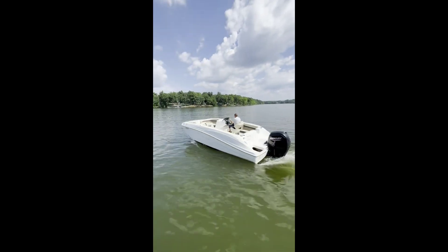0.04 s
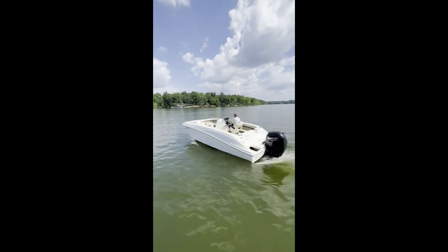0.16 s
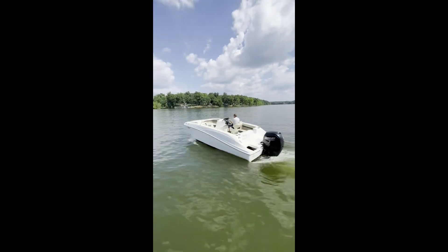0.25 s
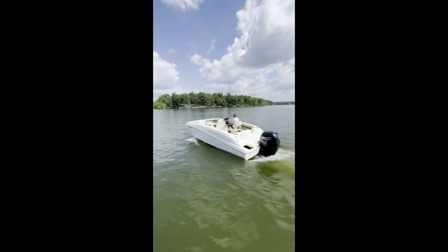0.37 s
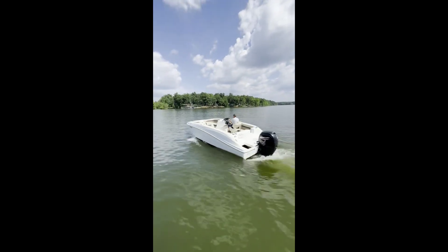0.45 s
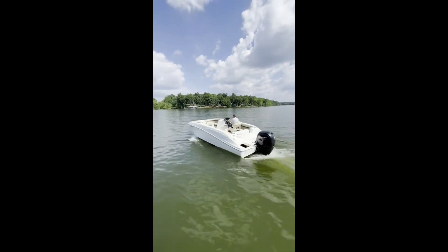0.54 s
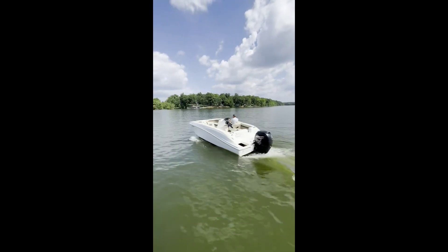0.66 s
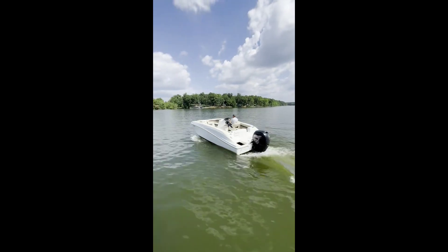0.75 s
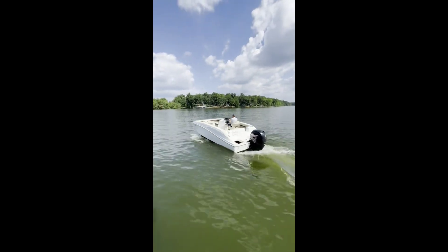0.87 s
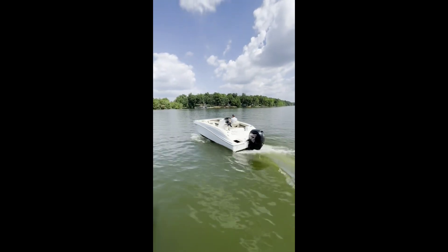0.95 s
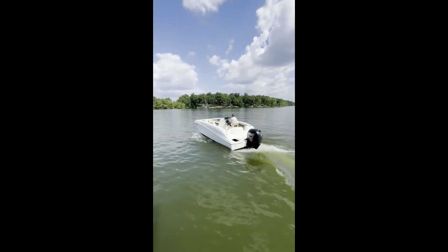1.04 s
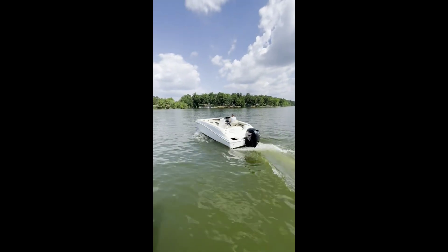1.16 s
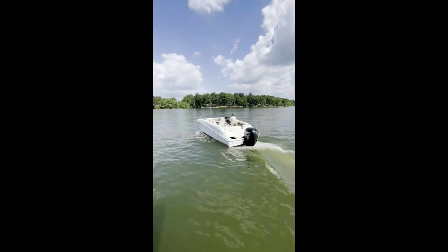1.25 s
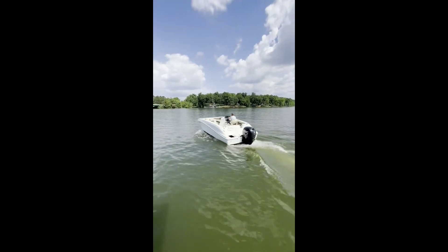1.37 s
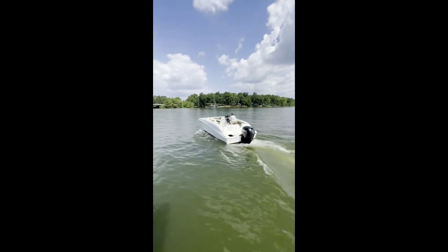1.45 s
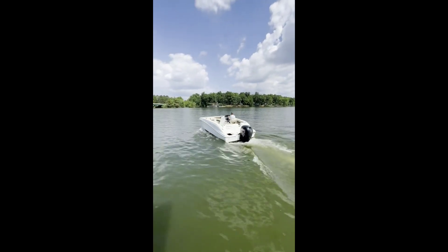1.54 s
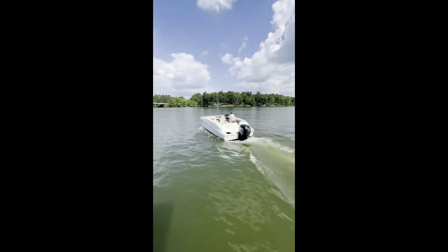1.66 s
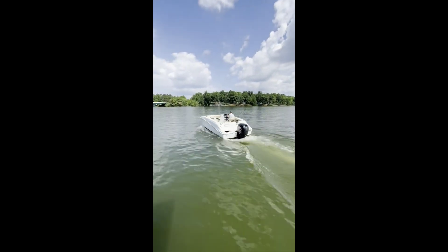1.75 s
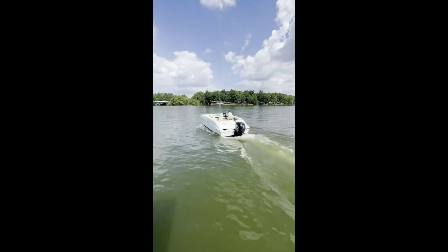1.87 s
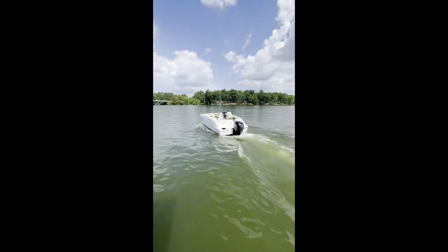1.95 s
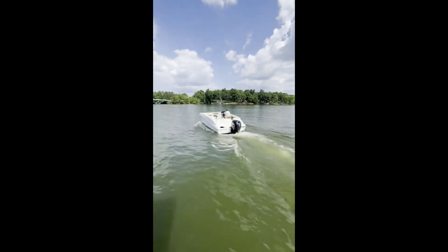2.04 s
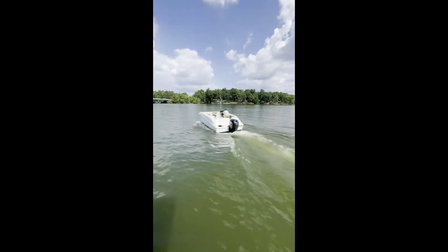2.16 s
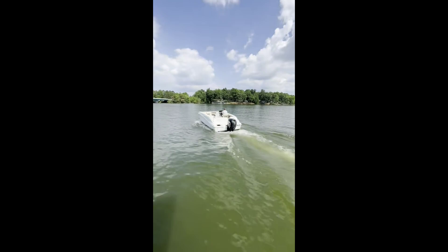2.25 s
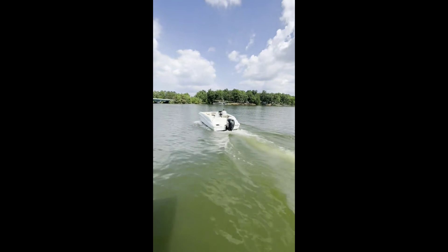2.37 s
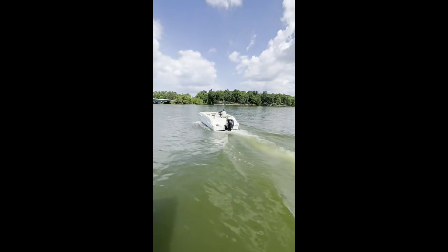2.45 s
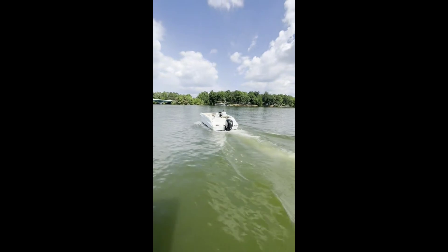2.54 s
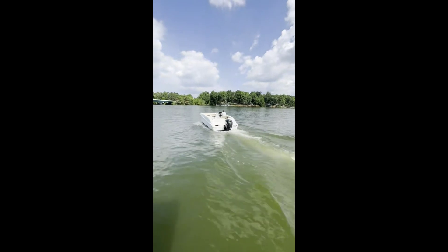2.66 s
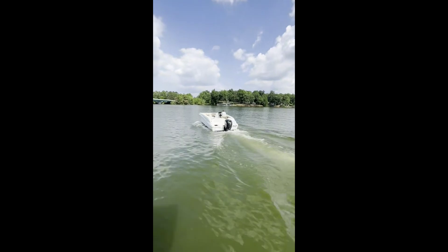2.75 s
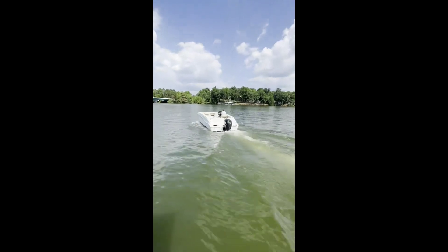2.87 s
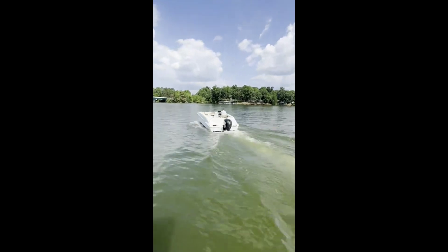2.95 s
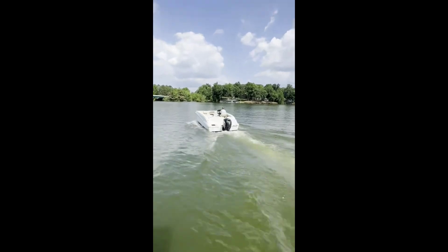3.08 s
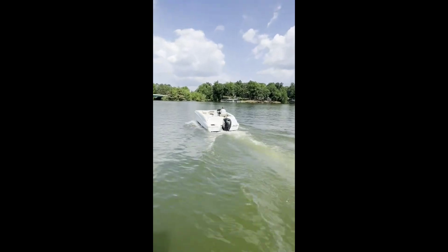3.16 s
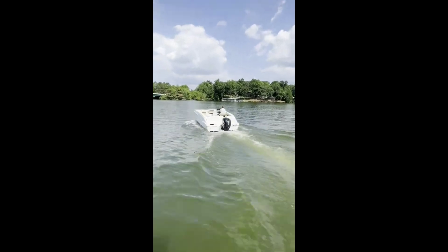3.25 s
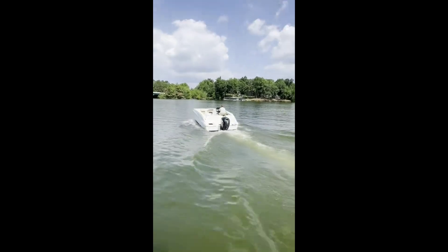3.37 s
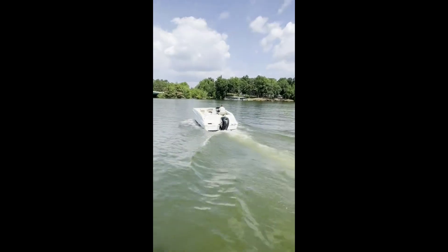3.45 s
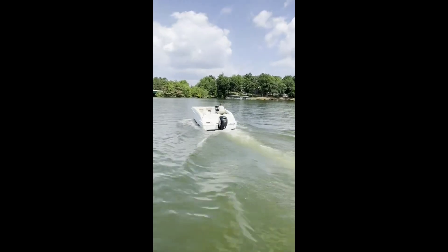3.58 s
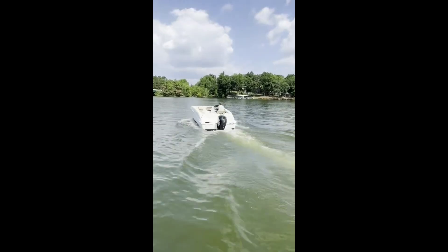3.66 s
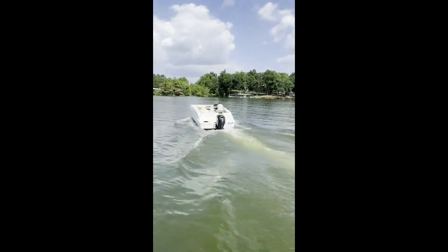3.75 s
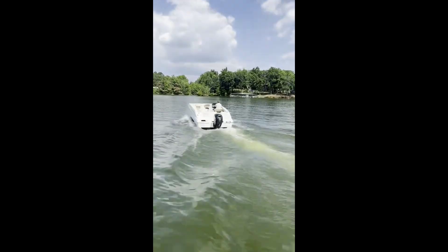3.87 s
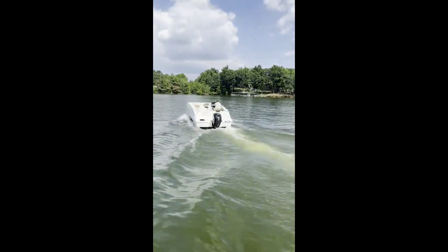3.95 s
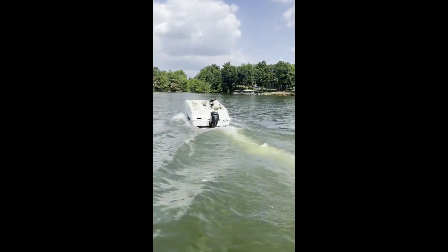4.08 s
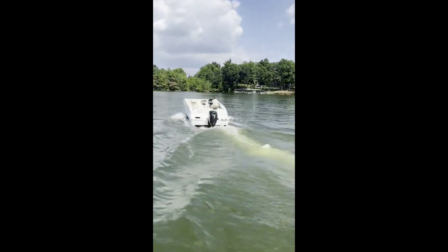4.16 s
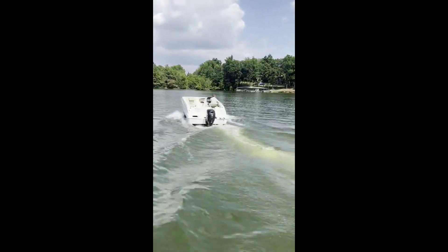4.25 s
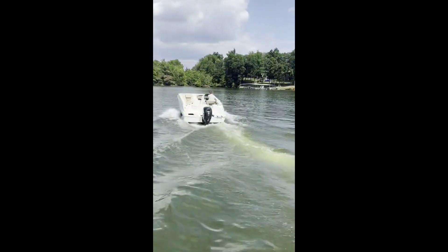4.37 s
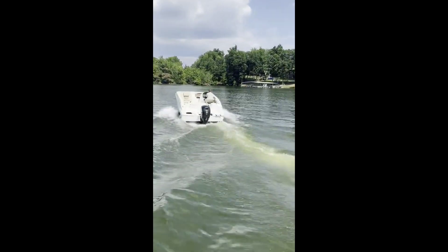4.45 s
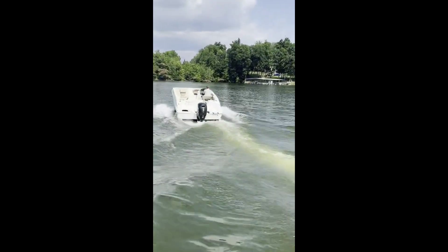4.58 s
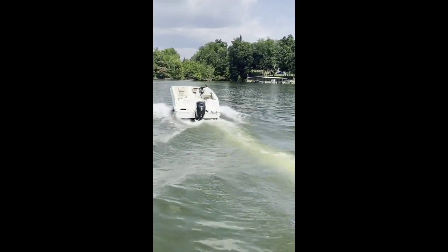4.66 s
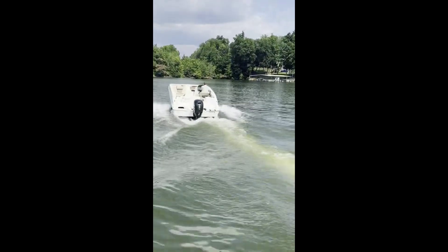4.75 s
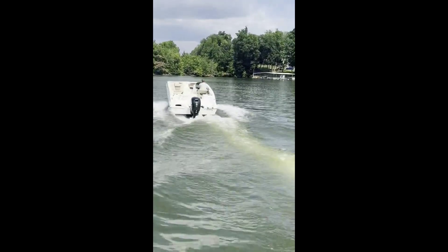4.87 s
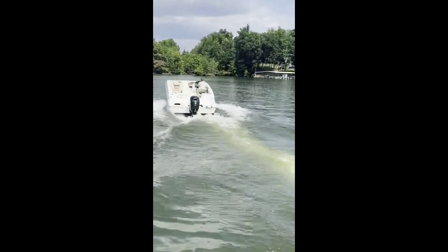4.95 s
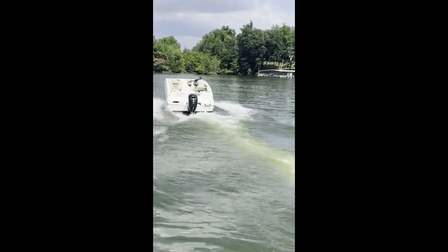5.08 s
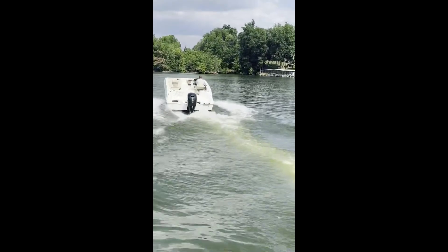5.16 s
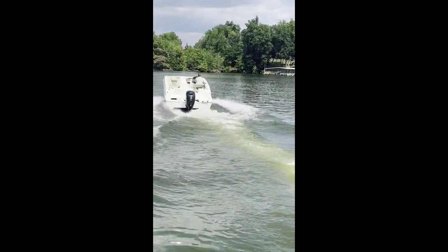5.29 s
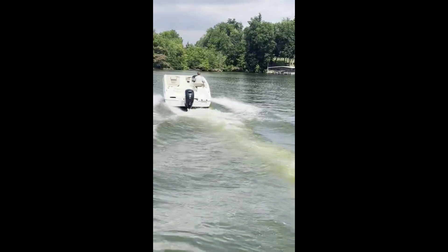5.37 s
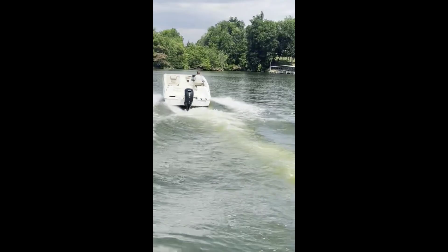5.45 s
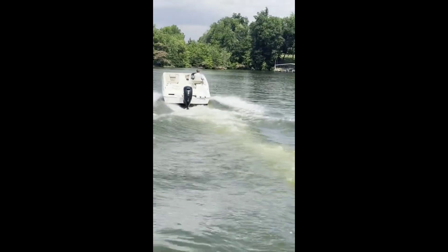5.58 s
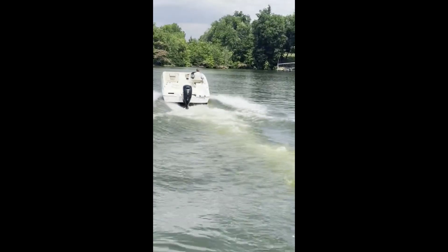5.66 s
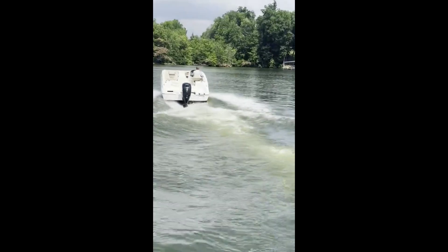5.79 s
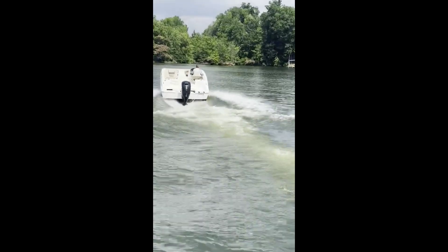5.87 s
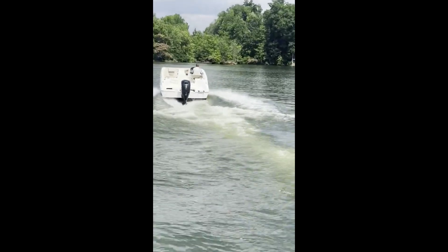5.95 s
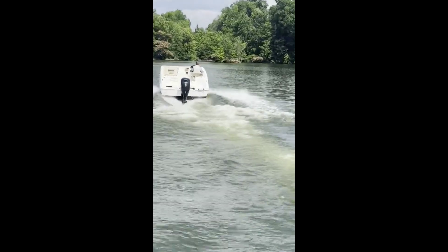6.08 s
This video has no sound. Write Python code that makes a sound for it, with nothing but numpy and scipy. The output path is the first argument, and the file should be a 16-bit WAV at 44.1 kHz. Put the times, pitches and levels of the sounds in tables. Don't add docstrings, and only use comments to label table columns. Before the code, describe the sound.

Open lake, handheld stereo microphone close to the water. From 0 to 3 seconds an outboard runs at low speed, a deep steady hum around 65 hertz whose strength swells and dips, with bubbling gurgle, churning wash and light hiss spread wide; a faint high whistle swells near 1.2 seconds. A second engine idles softly nearby throughout. Between 1.95 and 2.2 seconds fingers tap the casing: five small ticks with short hollow knocks, strongest at 2.13. At about 3.05 the throttle opens and pitch nearly doubles by 3.5, a swift swooping growl turning rough and raspy, water surging with it. From 3.7 to 6.1 the motor drones, buzzing and throbbing, rising slowly, with thin gear whine around 3.9 and 5.1. From about 4 seconds the stereo image narrows. The sound ends with the motor still running.

```python
import sys
import numpy as np
from scipy import signal
from scipy.fft import rfft, irfft, next_fast_len
from scipy.io import wavfile

SR = 44100
rng = np.random.default_rng(int(sys.argv[2]) if len(sys.argv) > 2 else 0)


def to_wav(s):
    ch = np.atleast_2d(s).T
    pcm = np.round(np.clip(ch, -1, 1) * 32767)
    wavfile.write(sys.argv[1], SR, pcm.astype(np.int16))


def linear_from_db(decibels):
    return 10 ** (np.asarray(decibels, float) / 20)


N = 269892


def rms_one(x):
    return x / np.sqrt(np.mean(x ** 2) + 1e-20)


def in_time(rows):
    s, *columns = np.transpose(rows)
    return [np.interp(np.arange(N) / SR, s, c) for c in columns]


def at_hz(points, hz):
    point_hz, level_db = np.transpose(points)
    return np.interp(np.log(hz + 1), np.log(point_hz), level_db)


def drift(rate):
    step = 40
    r = np.exp(-2 * np.pi * rate * step / SR)
    noise = rng.standard_normal(N // step + 2002)
    slow = signal.lfilter([1], [1, -2 * r, r * r], noise)[2000:]
    return np.interp(np.arange(N) / step, np.arange(len(slow)), rms_one(slow))


def band(x, low_hz, high_hz):
    size = next_fast_len(N)
    hz = np.arange(size // 2 + 1) * SR / size
    return irfft(rfft(x, size) * ((hz >= low_hz) & (hz < high_hz)), size)[..., :N]


def tone(turns, level_db, wobble_db, slip, rate=5, start=None):
    if start is None:
        start = rng.random()
    phase = 2 * np.pi * (turns + start) + slip * drift(rate)
    return np.sqrt(2) * linear_from_db(level_db + wobble_db * drift(8.8)) * np.cos(phase)


def swell(s, db, rise, fall):
    late = np.arange(N) / SR - s
    return linear_from_db(db) * np.exp(-.5 * (late / np.where(late < 0, rise, fall)) ** 2)


def swollen(floor_db, rows):
    return 20 * np.log10(linear_from_db(floor_db) + sum(swell(*row) for row in rows))


def water(turns, patchy_db):
    # (level at start [dB], trend at low speed [dB/s], trend under way [dB/s], surge [dB])
    layers = [
        (-32, -1, 1, 6),
        (-29, -0.74, -1.02, 3),
        (-35.5, -0.78, -0.39, -1),
        (-42, -2, 0, 0),
    ]
    bounds_hz = [25, 420, 1500, 5400, 15780]
    # (frequency [Hz], density [dB per Hz])
    colour = [(18, -26), (30, -18.5), (54, -7.5), (130, -1), (230, -7), (470, -12.5), (700, -9),
              (900, -13.5), (1900, -18), (2800, -23.5), (4560, -28.5), (6110, -31.5), (10200, -41),
              (15500, -42)]
    # (frequency [Hz], side minus mid [dB])
    spread = [(60, -15), (140, -26.5), (210, -26), (330, -3), (500, -2.5), (770, -17.5), (1170, -11),
              (1790, -21), (2500, 0.5), (3300, -6.5), (4300, 2.5), (6410, -6.5), (9810, 8), (15000, 4.5)]
    # (frequency [Hz], share of side that is the mid a quarter cycle off [-1 to 1])
    quadrature = [(60, .3), (300, 0.94), (700, 0.82), (1300, 0.99), (1800, .4), (2800, .6), (4600, .5),
                  (5400, 0), (6500, -.7), (10300, -.95), (13700, .9), (16000, .9)]
    # (time [s], level [dB])
    wake = [(0, -0.5), (.5, .5), (1.2, 0), (1.8, 1), (2.6, -.5), (3.8, -2.5), (4.9, 0.4), (5.3, -1),
            (6.12, 0)]
    throttle_s = 2.85
    size = next_fast_len(N)
    hz = np.arange(size // 2 + 1) * SR / size
    first, second = rfft(rng.standard_normal((2, size)))
    twist = np.clip(at_hz(quadrature, hz), -.99, .99)
    mid_gain = linear_from_db(at_hz(colour, hz))
    mid = first * mid_gain
    side = 1j * twist * first + np.sqrt(1 - twist ** 2) * second
    side = side * mid_gain * linear_from_db(at_hz(spread, hz))

    out, together = np.zeros((2, N)), drift(1.13)
    throb = linear_from_db(3.4 * np.cos(8 * np.pi * turns) + 1.6 * np.cos(2 * np.pi * turns))
    late, wake_db = np.arange(N) / SR, in_time(wake)[0]
    surge = swell(3.5, 4, rise=-0.62, fall=0.06)
    for k, (near_db, slow_db, fast_db, surge_db) in enumerate(layers):
        level_db = near_db + slow_db * np.minimum(late, throttle_s)
        level_db = level_db + fast_db * np.maximum(late - throttle_s, 0)
        level_db = level_db + surge_db * surge + wake_db
        edges, layer = np.geomspace(*bounds_hz[k:k + 2], num=5), 0
        for low, high in zip(edges, edges[1:]):
            part = irfft(np.array([mid, side]) * ((hz >= low) & (hz < high)), size)[:, :N]
            patches = 0.42 * together + 1.9 * drift(1.9) + drift(24)
            layer = layer + part * linear_from_db(patchy_db * patches)
        out += linear_from_db(level_db) * layer / np.std(layer[0]) * (throb if k == 0 else 1)
    return out


def aside(mid, side):
    # (time [s], share [0-1])
    left_first = [(0, .15), (1.1, .25), (1.6, .55), (2.3, .75), (3.7, .75), (4.1, .5), (4.35, .1),
                  (6.12, .1)]
    lag_s = 24.88 / 44100
    echo_s, echo_share = 1 / 581, 0.43
    share = np.clip(in_time(left_first)[0], 0, 1)
    near = band(np.array([mid, side]), 700, 5600)
    other = np.roll(near[0], N // 3)
    late = np.interp(np.arange(N) - lag_s * SR, np.arange(N), other)
    straight = np.array([near[0] + near[1], near[0] - near[1]])
    both = np.array([mid + side, mid - side])
    both = both + (np.sqrt(1 - share) - 1) * straight
    both = both + 0.71 * np.sqrt(share) * np.array([other, late])
    echo = np.roll(band(both, 2000, 5600), round(echo_s * SR), axis=1)
    return both - echo_share * share ** 2 * echo


def idler():
    # (time [s], shaft speed [turns per s])
    governor = [(0, 15.48), (2.25, 15.28), (2.45, 15.79), (4.45, 15.78), (4.55, 15.6), (5.05, 15.66),
                (5.8, 15.45), (6.12, 15.45)]
    # (order [per turn], level [dB])
    orders = [(3, -54), (7, -50), (8, -33), (12, -43)]
    turns = np.cumsum(in_time(governor)[0]) / SR
    hum_db = swollen(-43.5, [(4.8, -35, 1.0, .9)])
    hum = tone(5 * turns, hum_db, wobble_db=1.5, slip=.3)
    pulse = 0
    for order, level_db in orders:
        pulse = pulse + tone(order * turns, level_db, wobble_db=1.5, slip=0.16, start=.45)
    return hum + pulse * (1 + swell(5.8, -4.5, rise=1.2, fall=1.5))


def taps():
    # (time [s], tick level [dB], ring level [dB], ring length [s])
    touches = [
        (1.949, -34, -26, .002),
        (2.047, -20, -18, .0025),
        (2.1338, -17.5, -13, .0023),
        (2.1555, -27, -40, .001),
        (2.2035, -27, -21, .001),
    ]
    out, t = np.zeros((2, N)), np.arange(int(.03 * SR)) / SR
    glide = 0.0017 * (1 - np.exp(-t / 0.00062))
    for s, tick_db, ring_db, length in touches:
        tick = np.convolve(rng.standard_normal(len(t)), np.hanning(7) / 2, "same") * np.exp(-t / .0006)
        ring = np.sin(2 * np.pi * 640 * (t + glide)) * t / length * np.exp(1 - t / length)
        at = round(s * SR)
        out[:, at:at + len(t)] += linear_from_db(tick_db) * tick * [[.7], [-.9]]
        out[:, at:at + len(t)] += linear_from_db(ring_db) * ring * [[.55], [-1.15]]
    return out


def gear_whine(turns):
    # (time [s], level [dB], rise [s], fall [s])
    whine_swells = [(3.85, -49, 0.23, 0.38), (5.15, -50.5, .5, 0.64)]
    teeth, top_hz = 89.2, 2815
    meshes = np.cumsum(np.minimum(teeth * np.gradient(turns), top_hz / SR))
    return tone(meshes, swollen(-71.5, whine_swells), wobble_db=1.8, slip=2.3, rate=20)


def pump_whistle():
    # (time [s], level [dB], rise [s], fall [s])
    pump_swells = [(1.25, -51.5, 0.37, 0.23)]
    cycles = 2234 * np.arange(N) / SR
    return tone(cycles, swollen(-68, pump_swells), wobble_db=2.5, slip=0.72, rate=4.9)


def cowl_rasp(turns):
    # (frequency [Hz], width [Hz], level [dB])
    panels = [(1240, 100, 15), (1380, 99, 12), (1764, 200, 9.5), (2030, 170, -19), (3010, 67, -13)]
    rasp_db = swollen(-52, [(3.72, -35, 0.38, .5), (.1, -40.5, .3, 0.18)])
    puffs = rng.standard_normal(N) * linear_from_db(1.5 * np.cos(8 * np.pi * turns) + 1.5 * drift(20))
    rasp = 0
    for hz, width, level_db in panels:
        r = np.exp(-np.pi * width / SR)
        poles = [1, -2 * r * np.cos(2 * np.pi * hz / SR), r * r]
        rasp = rasp + linear_from_db(level_db) * rms_one(signal.lfilter([1, 0, -1], poles, puffs))
    return linear_from_db(rasp_db) * rms_one(rasp)


def order_swells(order):
    # (order [per turn], time [s], level [dB], rise [s], fall [s])
    all_swells = [(8, 0.88, -32, 0.4481, 0.28), (8, 3.33, -21, 0.046, 0.023), (8, 4.94, -23, 0.47, 0.44),
                  (12, 0.54, -26.5, 0.22, 0.19), (12, 2.72, -34, 0.066, 0.087),
                  (12, 3.32, -24.5, .025, .025), (12, 3.22, -29.5, .025, .025), (12, 3.68, -32, .2, .9),
                  (10, 3.7, -23.5, .25, 0.45), (10, 5.71, -29, 0.45, .6), (14, 4.8, -30.5, 0.34, 0.17),
                  (14, 3, -46, .3, .6), (11, 3.85, -27.5, .3, 0.6), (11, 5.52, -32.5, 0.38, .25),
                  (9, 3.71, -27, 0.32, .7), (9, 5.9, -33, .7, .5), (21, 4.54, -41.5, 0.78, 0.65),
                  (21, 6.0, -45, 0.72, .5), (26, 3.75, -41.5, 0.22, .9)]
    return [row[1:] for row in all_swells if round(row[0]) == order]


def firing_orders(hz, turns, loaded, firing_db):
    octave_db = swollen(np.interp(loaded, [0, 1], (-32.5, -33)), order_swells(8))
    twelfth_db = swollen(np.interp(loaded, [0, 1], (-40, -38.5)), order_swells(12))
    octave_start = .5 - np.clip(hz - 28, 0, 1) / 2
    out = tone(4 * turns, firing_db, wobble_db=.6, slip=.05 + 4 / 60, start=.5)
    out += tone(8 * turns, octave_db, wobble_db=1.2, slip=.05 + 8 / 60, start=octave_start)
    out += tone(12 * turns, twelfth_db, wobble_db=1.2, slip=.05 + 12 / 60, start=.5)
    return out


def blade_tone(hz, turns):
    passes_per_turn, in_step_s = 4.157, 5.308
    in_step = turns[round(in_step_s * SR)] * (4 - passes_per_turn) + .5
    gripping = np.clip(hz - 29.8, 0, 1)
    level_db = np.interp(gripping, [0, 1], (-40, -29)) + .9 * np.maximum(hz - 31, 0)
    return tone(passes_per_turn * turns, level_db, wobble_db=1.1, slip=.12, start=in_step)


def uneven_orders(hz, turns, loaded, uneven_db):
    # (frequency [Hz], level [dB])
    exhaust = [(30, -16), (62, -18), (95, -6), (160, -3), (195, -5.5), (225, 1.5), (365, -1.5), (400, -10),
               (480, -16.5), (530, -11.5), (600, -22), (680, -14), (760, -19), (900, -21)]
    lumpy_db = {7: 8.5, 11: 10.5}
    floor_db = -54.5
    uneven_db = uneven_db - at_hz(exhaust, 9 * hz) - 4 * (1 - loaded)
    out = np.zeros(N)
    for order in sorted(set(range(2, 28)) - {4, 8, 12}):
        level_db = uneven_db + at_hz(exhaust, order * hz) + lumpy_db.get(order, 0) * (1 - loaded)
        swells = order_swells(order)
        if swells:
            level_db = level_db + loaded * (swollen(floor_db, swells) - level_db)
        out += tone(order * turns, level_db, wobble_db=2.5, slip=.42, rate=8)
    return out


def outboard():
    # (time [s], speed [turns per s])
    shaft = [(0, 16.3), (.7, 16.35), (1.65, 16.4), (2.2, 16.55), (3.05, 16.72), (3.12, 18.7), (3.19, 21),
             (3.27, 24), (3.37, 27.3), (3.44, 28.7), (3.54, 29.5), (3.73, 30.1), (4.06, 30.6),
             (4.57, 31.45), (5.06, 32), (5.49, 32.7), (6.12, 33.55)]
    # (time [s], firing tone level [dB], uneven-cylinder level [dB])
    effort = [(0, -19.5, -46.5), (.8, -23.5, -44), (.95, -32.5, -42.5), (1.12, -19.5, -47.5),
              (1.35, -39.5, -47), (1.85, -24, -43.5), (2.12, -33, -48), (2.45, -25.5, -50), (2.9, -28, -50),
              (3.07, -31.5, -47.5), (3.14, -17.5, -44.5), (3.33, -13.5, -36), (3.43, -21, -30.5),
              (3.66, -24.5, -24), (3.9, -33, -28.5), (4.45, -26.5, -29.5), (5.1, -22, -32),
              (6.12, -23, -35.5)]
    hz = in_time(shaft)[0]
    firing_db, uneven_db = in_time(effort)
    turns = np.cumsum(hz) / SR
    loaded = np.clip((hz - 19) / 4.0, 0, 1)
    out = firing_orders(hz, turns, loaded, firing_db) + blade_tone(hz, turns)
    return out + uneven_orders(hz, turns, loaded, uneven_db), turns


def scene():
    motor, turns = outboard()
    slope = np.gradient(motor)
    width = 2.0 * slope + 2.1 * band(slope, 300, 1500)
    centre = motor + gear_whine(turns) + pump_whistle() + cowl_rasp(turns) + idler()
    return np.array([centre + width, centre - width]) + aside(*water(turns, patchy_db=0.74)) + taps()


def top_cut(x):
    return signal.sosfilt(signal.butter(12, 17040, fs=SR, output="sos"), x)


def record(dry):
    # (time [s], side level in the bass [dB], side level in the presence band [dB])
    zoom = [
        (0, 4.5, 4.5),
        (3.9, 3.5, 1.5),
        (4.2, -9, -8),
        (4.33, -7, -12),
        (4.36, -7, -55.5),
        (6.12, -5.5, -63.5),
    ]
    top_hz = 15790
    dry = dry + band(dry, 290, 2200) * [[.12], [-.12]]
    mid, side = (dry[0] + dry[1]) / 2, (dry[0] - dry[1]) / 2
    bass_db, presence_db = in_time(zoom)
    bass, presence = band(side, 0, 200), band(side, 1500, 5350)
    side = side + (linear_from_db(bass_db) - 1) * bass + (linear_from_db(presence_db) - 1) * presence
    mid = band(mid, 0, 10350) + band(mid, 13750, top_hz)
    side = band(side, 0, top_hz)
    return top_cut(np.array([mid + side, mid - side]))


dry = scene()
out = record(dry)
to_wav(out)
```